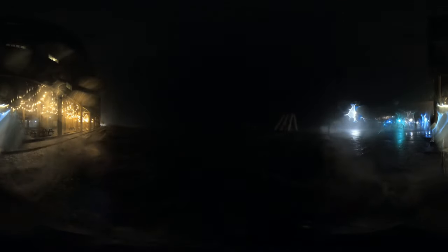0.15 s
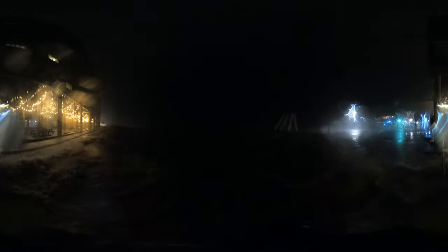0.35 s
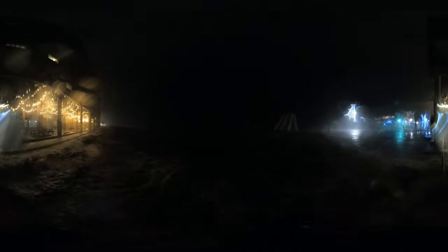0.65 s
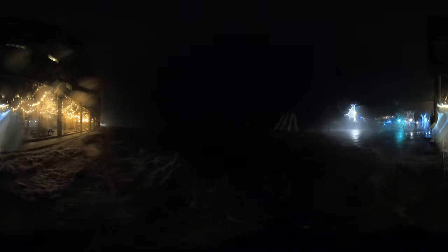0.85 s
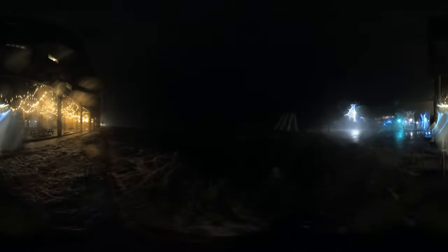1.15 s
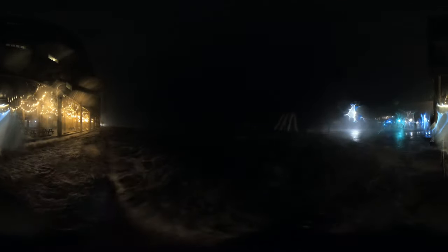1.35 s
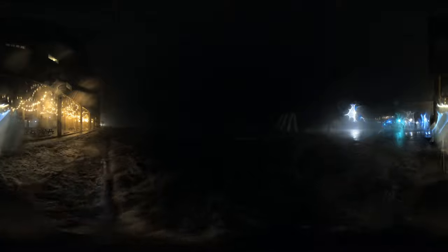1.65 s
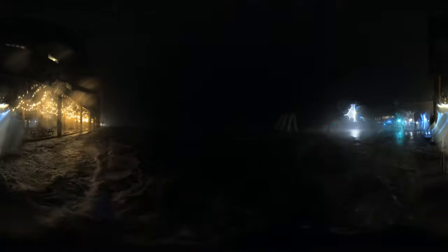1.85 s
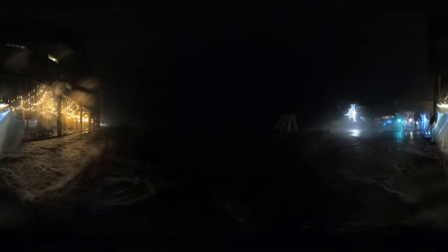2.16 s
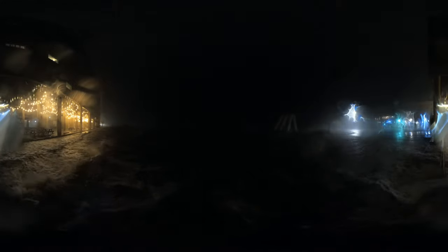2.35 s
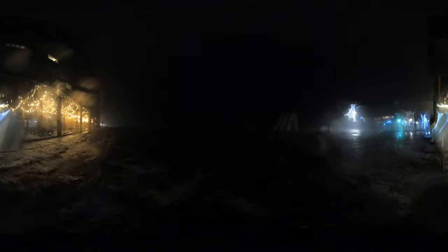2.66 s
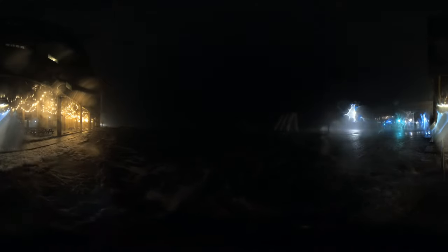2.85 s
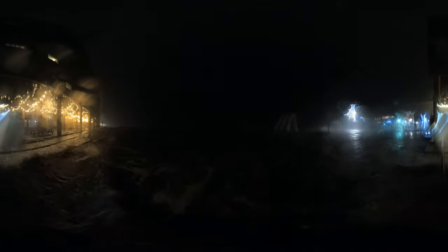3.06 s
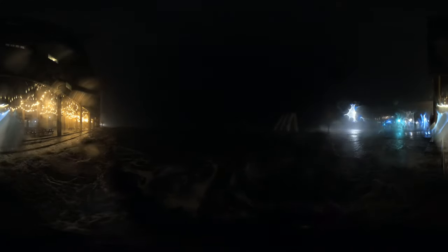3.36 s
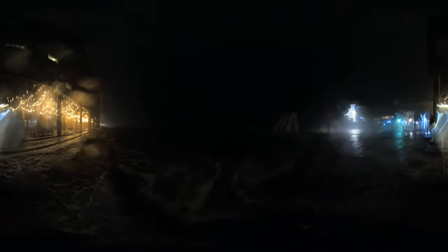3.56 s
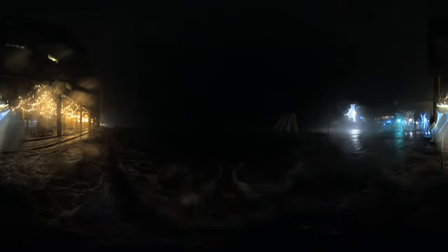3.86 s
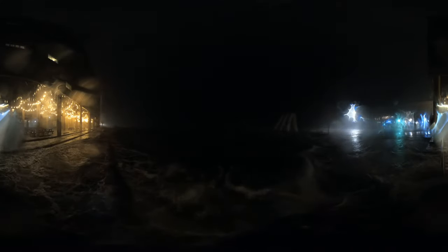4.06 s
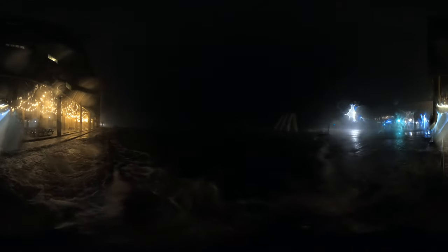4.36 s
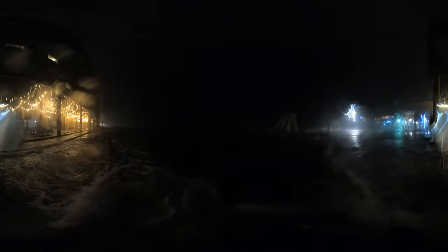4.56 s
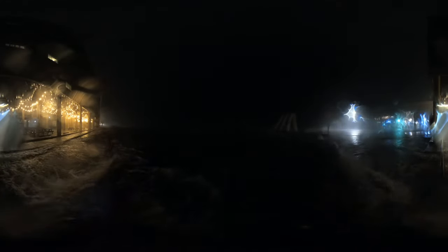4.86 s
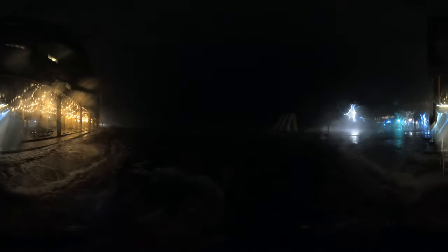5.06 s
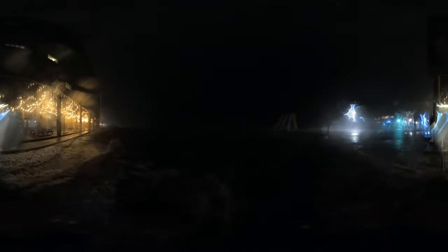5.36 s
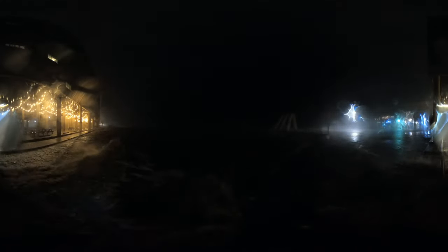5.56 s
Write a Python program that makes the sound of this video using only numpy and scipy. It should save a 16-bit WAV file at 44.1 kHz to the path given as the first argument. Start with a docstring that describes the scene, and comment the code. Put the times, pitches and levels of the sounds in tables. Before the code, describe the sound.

A strong gale rumbles and flutters right against an outdoor microphone beside dark water. The start is wettest: dense spatter, hiss, plops and sharp ticks on the housing in the first second. Spray then thins to scattered drops, returns briefly past two seconds, and leaves mainly roaring, faintly moaning wind until a last wet burst at the end.

```python
"""Storm wind and spray

A gale buffets a microphone in its housing: shaped noise flutters in gusts, roars, rushes and moans.
The same gusts drive spray: hissing mist, a hollow wash, a fine spatter and a wet crackle.
Single drops tick on the housing's resonances, splats are bursts of tiny impacts, plops are short
sinking tones, and one trapped bubble pings."""
import sys
import numpy as np
from scipy import signal
from scipy.fft import rfft, irfft, next_fast_len
from scipy.io import wavfile
from scipy.ndimage import uniform_filter1d, minimum_filter1d

SR = 44100
rng = np.random.default_rng(int(sys.argv[2]) if len(sys.argv) > 2 else 0)


def unload_audio(sound):
    """Save the sound as a 16-bit wav file, at the path given as the first command line argument."""
    columns = np.transpose(np.atleast_2d(sound))
    # keep every value between -1 and 1, then stretch to whole-number steps
    steps = np.round(np.clip(columns, -1, 1) * 32767)
    wavfile.write(sys.argv[1], SR, steps.astype(np.int16))


N = 251061
TIME = np.arange(N) / SR
LEAD = 256  # samples ahead of the main blow in a tick

# gusts at the microphone: peak t/s, relative strength/dB, rise of the small eddies/s,
# large eddies against small/dB, relative spray level/dB
GUST_TABLE = [(0.02, -32, 0.035, 9, -46.5), (0.16, -21, 0.18, -3, -49.5), (0.255, -24, 0.045, 5, -48.5),
              (0.381, -19.5, 0.033, -5.5, -49), (0.52, -31, 0.098, 8.5, -50), (0.6, -33, 0.05, 8, -49),
              (0.68, -25, 0.06, 4.5, -52), (0.84, -23, 0.014, -15.5, -53), (1.05, -33, 0.04, 11.5, -57.5),
              (1.35, -26.5, 0.061, 1.5, -65), (1.7, -27.5, 0.064, 3.5, -69),
              (1.87, -20.5, 0.058, 0.5, -54.5), (1.98, -29, 0.044, 7, -57.5), (2.275, -22, 0.046, 7.5, -49),
              (2.355, -21, 0.042, 2, -51), (2.5, -25.5, 0.047, 6.5, -53), (2.899, -25.5, 0.074, 3.5, -75),
              (3.15, -26.5, 0.068, -4.5, -82), (3.35, -28.5, 0.069, 5.5, -76),
              (3.59, -26.5, 0.065, 7.5, -58.5), (3.799, -25, 0.091, -1.5, -54),
              (4.032, -28.5, 0.061, 1, -55.5), (4.47, -19, 0.055, -3, -60), (4.62, -26, 0.036, 1, -70),
              (4.8, -24, 0.07, -5, -76.5), (4.97, -24, 0.06, 0.5, -65), (5.66, -19.5, 0.082, -0.5, -48.5)]


def gain_of(db):
    """Decibels to amplitude."""
    return 10 ** (np.asarray(db) / 20)


def evened(x):
    """Scales to rms 1."""
    return x / np.sqrt(np.mean(x ** 2) + 1e-20)


def read(points, hz):
    """Reads a spectrum's dB on a log-frequency axis."""
    f, db = np.transpose(points)
    return np.interp(np.log(hz + 1), np.log(f + 1), db)


def noise(points):
    """Noise of rms 1 with the given spectral shape."""
    size = next_fast_len(N)
    hz = np.fft.rfftfreq(size, 1 / SR)
    spectrum = rfft(rng.standard_normal(size)) * gain_of(read(points, hz))
    return evened(irfft(spectrum, size)[:N])


def wobble(rate_hz):
    """Slow random motion of rms 1, fading out above the given rate."""
    size = next_fast_len(N)
    hz = np.fft.rfftfreq(size, 1 / SR)
    spectrum = rfft(rng.standard_normal(size)) / (1 + (hz / rate_hz) ** 4)
    return evened(irfft(spectrum, size)[:N])


def steadied(x, size):
    """Takes the slow swells out of a noise and keeps its quick lumps; size is in samples."""
    power = uniform_filter1d(uniform_filter1d(x ** 2, size), size)
    return x / np.sqrt(abs(power) + 1e-9)


def resonate(x, hz, width_hz):
    """One resonance of gain 1."""
    return signal.lfilter(*signal.iirpeak(hz, hz / width_hz, SR), x)


def add(mix, s, sound):
    """Mixes a sound in at its time."""
    part = mix[round(s * SR):][:len(sound)]
    part += sound[:len(part)]


def gusts(levels_db, lull_db, stretch=1):
    """Each gust swells and dies away more slowly; their powers add to that of the lull."""
    fall_per_rise = 1.34
    power = np.ones(N) * gain_of(lull_db) ** 2
    for (s, _, rise_s, _, _), db in zip(GUST_TABLE, levels_db):
        width_s = stretch * rise_s * np.where(TIME < s, 1, fall_per_rise)
        power += gain_of(db) ** 2 * np.exp(-((TIME - s) / width_s) ** 2)
    return np.sqrt(power)


def flow(force_db):
    """Strength of the air at the microphone: large slow eddies, small quick ones, and the spray."""
    large_stretch, spray_stretch = .92, 0.57  # lengths as shares of the gust's
    lull_large_db, lull_small_db, lull_spray_db = -30, -31.5, -60  # what is left between gusts
    lull_follows = 0.52  # dB of flutter between gusts per dB of gale force
    _, strength_db, _, weight_db, spray_db = np.transpose(GUST_TABLE)
    large = gusts(strength_db + weight_db, lull_large_db, large_stretch)
    small = gusts(strength_db, lull_small_db + lull_follows * force_db)
    spray = gusts(spray_db, lull_spray_db, spray_stretch)
    return large, small, spray


def buffet(large_push, small_push, large_db=1, small_db=1.02, lumps_db=1.27):
    """Eddies shed at the microphone port: large ones push deeply, small ones flutter."""
    # spectral shapes of the two eddy sizes: f/Hz, relative density/dB
    deep_shape = [(8, -8.5), (18, 11.5), (29, 10), (50, 10), (75, -4.5), (150, -33), (600, -79),
                  (4000, -135)]
    flutter_shape = [(30, -20), (62, -1), (95, 1.5), (125, -2.5), (170, -10), (260, -19.5), (450, -40),
                     (800, -33), (1300, -54.5), (2500, -73), (5000, -92.5), (12000, -130)]
    large = steadied(noise(deep_shape), size=3000) * large_push * gain_of(large_db)
    small = steadied(noise(flutter_shape), size=2800) * small_push * gain_of(small_db)
    return (large + small) * gain_of(lumps_db * wobble(18.0))


def gale(force_db, push, low_db=-31, rush_db=-40.5, rush_growth=1.58, gust_db=-16,
         flutter_db=1.26, grain_db=0.92):
    """Wind over water and buildings: a low roar, and a rush that grows faster and rises in gusts."""
    # spectral shapes of the low roar and of the brighter rush: f/Hz, relative density/dB
    roar_shape = [(40, -20.5), (110, -2), (170, 5), (240, 3), (290, 3), (350, 1.5), (430, -4.5), (560, -12),
                  (800, -31), (1400, -50), (3000, -74), (9000, -120)]
    rush_shape = [(250, -16), (420, 3), (560, 3.5), (760, 1), (900, -5.5), (1100, -14), (1450, -21),
                  (1750, -26), (2200, -32), (3200, -40), (4200, -50.5), (6000, -55), (7500, -71),
                  (15000, -105)]
    low = steadied(noise(roar_shape), size=4000) * gain_of(force_db + low_db)
    # rush_growth: dB of rush per dB of gale force
    rush_level = np.hypot(gain_of(rush_growth * force_db + rush_db), push * gain_of(gust_db))
    rush = steadied(noise(rush_shape), size=4000) * rush_level
    grain = evened(gain_of(grain_db * wobble(100)))
    return (low + rush * grain) * gain_of(flutter_db * wobble(27))


def moans(width_hz=38, trim_db=-1, edge_s=.05, waver=.045):
    """Eddies shed by posts and eaves sing as narrow, fuzzy bands that slide and waver in pitch."""
    # one curve for each moan: t/s, centre f/Hz before the waver, relative level/dB
    moan_curves = [
        [(0, 320, -45.5), (1.0, 329.8, -38), (1.5, 322.8, -34.5), (2.3, 329.9, -33), (2.7, 312, -40),
         (3.2, 319.9, -38), (3.6, 340.6, -33.5), (4.1, 348.9, -33), (4.9, 351, -28.5), (5.3, 368.3, -33.5),
         (5.69, 379, -32.5)],
        [(.55, 180.7, -42.5), (.85, 200, -32), (1.15, 250, -31.5), (1.4, 309.4, -37.5), (1.6, 304, -50.5)],
        [(3.95, 320, -33.5), (4.22, 300, -40.5), (4.34, 275, -25.5), (4.6, 270, -30.5), (4.8, 205.4, -28),
         (4.98, 184.5, -24.5), (5.2, 177.7, -35)],
    ]
    out = np.zeros(N)
    for curve in moan_curves:
        s, hz, db = np.transpose(curve)
        pitch_hz = np.interp(TIME, s, hz) * (1 + waver * wobble(3))
        turn = np.exp(2j * np.pi * np.cumsum(pitch_hz) / SR)
        # a slow complex noise on the sliding tone smears it into a band
        fuzz = wobble(width_hz) + 1j * wobble(width_hz)
        song = steadied((fuzz * turn).real, size=4000)
        sounding = np.clip(np.minimum(TIME - s[0], s[-1] - TIME) / edge_s, 0, 1)
        out += song * sounding * gain_of(np.interp(TIME, s, db) + trim_db)
    return out


def tick(corner_hz, ring_hz, ring_db=3.5, width_hz=330, abruptness=0.48, lag_s=0.001149, size=1024):
    """The housing answers a blow: soft contact dulls it, low notes cross the shell later, a spot rings."""
    # response of the housing: f/Hz, relative level/dB
    shell_response = [(300, -31), (1100, 1.5), (1750, -1), (2500, -3.5), (3200, -5), (4000, -8), (6300, -8),
                      (8000, -13), (9700, -19.5), (11500, -8.5), (13300, -34.5), (15000, -43.5)]
    signed_hz = np.fft.fftfreq(size, 1 / SR)
    hz = abs(signed_hz)
    contact = 1 / np.sqrt(1 + (hz / corner_hz) ** 6)
    log_gain = np.log(gain_of(read(shell_response, hz)) * contact + 1e-5)
    # abruptness 1 would be minimum phase
    onset_phase = abruptness * signal.hilbert(log_gain).imag
    # bending waves: the delay falls with frequency, to roughly lag_s near 1 kHz
    bending = 2 * np.pi * lag_s * 1000 * np.arcsinh(signed_hz / 500)
    knock = np.fft.ifft(np.exp(log_gain - 1j * (onset_phase + bending))).real
    knock = np.roll(knock, LEAD)
    return knock + gain_of(ring_db) * resonate(knock, ring_hz, width_hz)


def drops(trim_db=1.96, scatter_db=-15, scatter_t60=0.047, size=2600):
    """Each drop ticks, then its fragments patter down for a moment."""
    # single drops on the housing: t/s, relative strength/dB, contact corner f/Hz (higher is harder),
    # ring f/Hz of the struck spot, ring level/dB
    drop_table = [(0.1408, -21, 6200, 4130, 4), (0.1485, -24, 6700, 6140, 6), (0.1768, -8, 2400, 3860, 6),
                  (0.1846, -17, 2400, 3500, 8), (0.1932, -10, 2200, 3600, 5), (0.2145, -31, 5000, 4600, 2),
                  (0.252, -22.5, 3940, 4000, 6), (0.265, -18, 2400, 2300, 4), (0.2920, -16, 4830, 2130, 5),
                  (0.3106, -23, 6160, 5400, 4), (0.3433, -17, 2500, 3700, -2.5),
                  (0.4535, -26, 3000, 3200, 12), (0.5738, -7, 14100, 6260, -10),
                  (0.626, -29, 14000, 3710, 6), (0.636, -28, 13900, 3900, 13),
                  (0.6471, -19, 4500, 4000, -3), (0.665, -20, 2900, 3900, 4), (0.6866, -36, 6040, 3700, -5),
                  (0.7243, -30, 6000, 3700, 4), (0.7458, -22, 7300, 2460, 5), (0.8365, -27, 3800, 3500, 0),
                  (0.8628, -14.5, 4060, 4000, -4), (0.8736, -27, 4400, 4300, 6),
                  (0.889, -31, 5400, 5300, 12), (0.914, -22, 9200, 4400, 2), (0.952, -31, 3000, 3300, 11),
                  (1.0152, -26, 4800, 3700, -8), (1.045, -29, 3820, 3220, 2),
                  (1.0976, -7.5, 1990, 3250, 10), (1.202, -25.5, 4370, 3940, 5),
                  (1.3356, -28, 5000, 3000, 0), (1.383, -22, 3400, 2900, -3), (1.4019, -11, 5400, 3150, 7),
                  (1.40253, -11, 5000, 4550, 8), (1.5172, -35, 6000, 4430, 2.5),
                  (1.6574, -21.5, 4200, 1900, -1), (1.808, -12.5, 3000, 5500, 7),
                  (1.8497, -4, 2020, 4520, 6.5), (1.975, -17.5, 3600, 5800, 7), (2.01, -29, 5540, 5600, 5),
                  (2.288, -14, 3530, 2400, 2), (2.491, -23, 3400, 2000, -2), (2.506, -10, 2300, 4300, 7),
                  (2.525, -18.5, 14000, 5700, 5), (2.746, -28, 5000, 4000, -3),
                  (2.835, -28.5, 6960, 4000, 3), (2.877, -28, 6040, 5450, -8),
                  (3.1588, -29, 2880, 3050, 12), (3.2443, -21, 4800, 6450, 4),
                  (3.436, -12.5, 2700, 4020, 4), (3.5488, -21.5, 5800, 4170, -1),
                  (3.586, -29, 5520, 4000, -2), (3.6275, -24, 6340, 4140, -5), (3.742, -3, 3850, 2560, 4.5),
                  (4.0325, -10, 3400, 2970, 9), (4.0606, -24, 4200, 2400, 3),
                  (4.0834, -25.5, 5500, 4000, -8), (4.1214, -30, 5500, 3970, 2),
                  (4.146, -14.5, 3480, 6400, 0.5), (4.2415, -11, 2300, 4870, 4),
                  (4.4633, -27, 5500, 5200, 0), (4.4766, -29, 5950, 4000, 6), (4.514, -34, 5500, 3820, -5),
                  (4.9627, 0, 4300, 1850, 8), (5.4725, -6.5, 2090, 3220, 5),
                  (5.5735, -10.5, 2510, 3220, 4.5), (5.6255, -11.5, 3500, 4500, 4),
                  (5.644, -8, 5200, 5700, 3), (5.662, -16, 6200, 7000, 5), (5.6763, -8, 2990, 3400, 5)]
    out, t = np.zeros(N), np.arange(size) / SR
    for s, db, corner_hz, ring_hz, ring_db in drop_table:
        fragments = rng.laplace(size=size) * gain_of(-60 * t / scatter_t60)
        fragments /= np.linalg.norm(fragments)
        blow = signal.unit_impulse(size) + gain_of(scatter_db) * fragments
        sound = signal.fftconvolve(blow, tick(corner_hz, ring_hz, ring_db))
        add(out, s - LEAD / SR, gain_of(db + trim_db) * sound)
    return out


def splats(hardness=0.8, film_hz=3700):
    """Each blob slaps as a dense, even burst of tiny impacts; the film of water muffles their treble."""
    # blobs of water that slap and spread: t/s, level/dB, length/s, centre f/Hz
    splat_table = [(0.09, -44, 0.17, 950), (0.121, -43.5, 0.035, 1800), (0.178, -43, 0.02, 2480),
                   (0.182, -37.5, 0.012, 3300), (0.2, -48.5, 0.11, 1900), (0.252, -42.5, 0.092, 990),
                   (0.315, -46, 0.045, 1900), (0.352, -53, 0.04, 3400), (0.383, -50, 0.035, 2400),
                   (0.477, -47, 0.083, 1900), (0.59, -57, 0.083, 1700), (0.658, -41, 0.01, 2600),
                   (0.865, -50, 0.014, 2090), (1.014, -52.5, 0.021, 1750), (1.05, -48.5, 0.017, 2140),
                   (1.214, -49, 0.027, 1540), (1.245, -52.5, 0.036, 1180), (2.248, -52.5, 0.047, 1700),
                   (2.335, -45, 0.037, 1250), (2.387, -53, 0.05, 1750), (3.752, -47.5, 0.12, 1170),
                   (3.795, -45.5, 0.0088, 2400), (4.156, -44, 0.013, 1500), (4.402, -44.5, 0.061, 1100),
                   (4.9, -48.5, 0.17, 1100), (5.636, -43, 0.015, 1350), (5.655, -38, 0.017, 2400),
                   (5.668, -37, 0.0086, 3100), (5.68, -40, 0.016, 2900)]
    out = np.zeros(N)
    film = signal.butter(4, film_hz, fs=SR, output="sos")
    for s, db, length_s, hz in splat_table:
        count = round(length_s * SR)
        shell = tick(hardness * hz, hz, ring_db=0)
        impacts = signal.fftconvolve(rng.laplace(size=16384), shell, "valid")
        muffled = steadied(signal.sosfilt(film, impacts), size=300)
        burst = muffled[:count] * signal.windows.tukey(count, .6)
        add(out, s, gain_of(db) * evened(burst))
    return out


def plop(hz, swell_s, sag_per_s, size=900):
    """A drop landing in the film of water swells for a few cycles and dies, sinking as it spreads."""
    t = np.arange(size) / SR
    turns = np.cumsum(hz * np.exp(-sag_per_s * (t - swell_s))) / SR
    swell = (t / swell_s * np.exp(1 - t / swell_s)) ** 2
    return swell * np.sin(2 * np.pi * (turns + rng.random()))


def plops(trim_db=-2):
    """The larger drops that land in the film, each a sinking tone."""
    # t/s, relative level/dB, f/Hz at the top of the swell, swell/s, sinking of the pitch per s
    plop_table = [(0.0468, -43, 1940, .0011, 30), (0.13, -37, 1780, .0011, 30),
                  (0.138, -36, 1800, .0011, 60), (0.1418, -40, 1350, .0015, 70),
                  (0.182, -27, 1850, .0009, 30), (0.1906, -33, 1760, .0008, 30),
                  (0.202, -29, 1780, .0011, 50), (0.2235, -34, 1800, .0014, 30),
                  (0.2368, -34, 1850, .0012, 30), (0.2628, -29, 2000, .0011, 70),
                  (0.2915, -36, 2200, .0011, 40), (0.2963, -28.5, 1850, .0013, 80),
                  (0.326, -30, 1700, .0013, 50), (0.3427, -31, 1900, .0012, 70),
                  (0.4004, -38, 1650, .0011, 30), (0.489, -33, 1900, .001, 30),
                  (0.498, -34, 1750, .0011, 30), (0.505, -36, 1950, .0011, 30),
                  (0.5235, -39, 1900, .0008, 30), (0.532, -44, 1850, .0012, 30),
                  (0.5534, -30, 1600, .0008, 60), (0.646, -32, 1860, .0015, 30),
                  (0.6604, -36, 1660, .0011, 30), (0.668, -30, 1750, .0009, 50),
                  (0.7075, -36, 1900, .0008, 50), (1.0566, -37, 1640, .0011, 30),
                  (1.0972, -42, 1760, .0011, 30), (1.1657, -42, 1740, .0011, 30),
                  (1.4036, -33.5, 1600, .002, 8), (1.7973, -38, 1660, .0011, 30),
                  (1.956, -42.5, 1920, .0011, 30), (2.2507, -37, 1600, .0011, 30),
                  (2.279, -34, 1560, .0018, 20), (2.2867, -41, 1770, .0011, 30),
                  (2.3501, -37, 1600, .0011, 30), (2.3565, -40, 1700, .0013, 30),
                  (2.3925, -35, 1600, .0011, 30), (2.4137, -34, 1650, .0013, 30),
                  (2.424, -35, 1700, .0018, 10), (2.5095, -39, 1650, 0.0012, 30),
                  (2.5226, -38, 1640, .0011, 30), (3.269, -40, 1770, .0013, 30),
                  (3.4136, -40, 1820, .0011, 30), (3.7433, -28, 1650, .0014, 70),
                  (3.7977, -31.5, 1720, .0014, 10), (3.8074, -37, 2020, .0008, 30),
                  (4.16, -36, 1590, .0008, 30), (4.394, -30, 1680, .0024, 18),
                  (4.411, -38, 1740, .0016, 20), (4.528, -42, 1620, .0011, 30),
                  (5.645, -30, 1650, .0018, 25), (5.6605, -29, 2050, .0014, 30),
                  (5.6684, -24, 1900, .0014, 10), (5.6725, -35, 2150, .0014, 10),
                  (5.678, -31, 1980, .0016, 10), (5.684, -31, 2100, .0016, 10)]
    out = np.zeros(N)
    for s, db, hz, swell_s, sag_per_s in plop_table:
        add(out, s, gain_of(db + trim_db) * plop(hz, swell_s, sag_per_s))
    return out


def bubble(start_s=1.4022, hz=4800, t60=0.038, level_db=-46.5):
    """One drop traps a bubble, which pings as a single dying tone."""
    t = np.maximum(TIME - start_s, 0)
    return gain_of(level_db - 60 * t / t60) * np.sin(2 * np.pi * hz * t)


def rain_of(per_s, corner_hz, spread_db):
    """Droplets at random moments and of random size, on spots that ring differently."""
    # rings of the spots on the housing that droplets strike: f/Hz
    spot_rings = [1530, 2420, 3130, 4830]
    out = np.zeros(N)
    for ring_hz in spot_rings:
        hit = rng.random(N) < per_s / len(spot_rings) / SR
        size_db = spread_db * np.minimum(rng.exponential(1, N), 3)
        blow = gain_of(size_db) * rng.choice([-1, 1], N)
        out += signal.oaconvolve(hit * blow, tick(corner_hz, ring_hz))[:N]
    return evened(out)


def spatter(spray, soft_db=-6, hard_db=-16, clump_db=3, stray_db=-77):
    """Soft droplets and fainter hard ones clump and follow the gusts; strays land at any time."""
    soft = rain_of(per_s=370, corner_hz=1600, spread_db=2.5)
    hard = rain_of(per_s=150, corner_hz=4300, spread_db=-1.5)
    stray = rain_of(per_s=19, corner_hz=3800, spread_db=0.0)
    clumps = evened(gain_of(clump_db * wobble(23)))
    driven = (soft * gain_of(soft_db) + hard * gain_of(hard_db)) * clumps * spray
    return driven + stray * gain_of(stray_db)


def crackle(spray, level_db=-3, per_s=200, low_hz=1550, high_hz=3300, octave_db=-11, spread_db=3,
            wetting_db=-54, count=10):
    """Heavy spray lands in the film as tiny plops; smaller ones are higher, shorter and fainter."""
    out = np.zeros(N)
    for hz in np.geomspace(low_hz, high_hz, count):
        hit = rng.random(N) < per_s / count / SR
        size_db = spread_db * np.minimum(rng.exponential(1, N), 3) + octave_db * np.log2(hz / low_hz)
        out += signal.oaconvolve(hit * gain_of(size_db), plop(hz, 1.8 / hz, 50))[:N]
    # the housing is wet only while the spray is strong
    wet = spray ** 2 / (spray ** 2 + gain_of(wetting_db) ** 2)
    return evened(out) * spray * wet * gain_of(level_db)


def wash(spray, hz=930, width_hz=480, trim_db=1):
    """Heavy spray runs over the housing as a sheet of water, with a hollow rush."""
    sheet = resonate(resonate(rng.standard_normal(N), hz, width_hz), hz, width_hz)
    return evened(sheet) * spray * gain_of(trim_db)


def hiss(spray, pressure, trim_db=-5, flutter_db=1, lull_share=0.67):
    """Mist brushes the housing in puffs, one with each swing of the air pressure."""
    # spectral shape of the mist: f/Hz, relative density/dB
    mist_shape = [(500, -5.5), (1000, 12.5), (1400, 4), (1700, 11), (2300, -18.5), (3200, -20), (4200, -25),
                  (6000, -27.5), (8000, -57), (14000, -64)]
    puffs = evened(np.hypot(lull_share, steadied(pressure, size=6000)))
    return noise(mist_shape) * spray * puffs * gain_of(trim_db + flutter_db * wobble(45))


def scene():
    """Wind and water at one microphone, driven by the same gusts."""
    # force of the gale around the microphone: t/s, relative level/dB
    gale_force = [(0, 0), (.29, -1), (.55, 1), (.9, -0.5), (1.31, 1.7), (1.54, 0), (1.89, 4), (2.1, 1),
                  (2.36, 1.5), (2.55, -2), (2.75, -2), (2.92, -2.5), (3.3, 0), (3.46, 4.5), (3.72, 0.5),
                  (3.85, 1), (4.25, 3.5), (4.35, 4), (4.44, 5.5), (4.6, 6.5), (4.72, 4.5), (5.0, 6.5),
                  (5.38, 4.5), (5.62, 6.5), (5.69, 4)]
    force_db = np.interp(TIME, *np.transpose(gale_force))
    large, small, spray = flow(force_db)
    wind = buffet(large, small) + gale(force_db, small) + moans()
    water = hiss(spray, wind) + wash(spray) + spatter(spray) + crackle(spray)
    water += splats() + plops() + drops() + bubble()
    return (wind + water)[None]


def record(dry):
    """A quick limiter rounds off the largest pressure swings; then soft ends and the band limit."""
    edge_hz = 14500
    allowed = np.minimum(1, .45 / (abs(dry) + 1e-9))
    held = minimum_filter1d(allowed, size=600)
    gain = uniform_filter1d(uniform_filter1d(held, size=300), size=300)
    ends = signal.windows.tukey(N, .0006)
    lowpass = signal.firwin(255, edge_hz, window=("kaiser", 9), fs=SR)
    return signal.oaconvolve(dry * gain * ends, lowpass[None], "same")


dry = scene()
out = record(dry)
unload_audio(out)
```